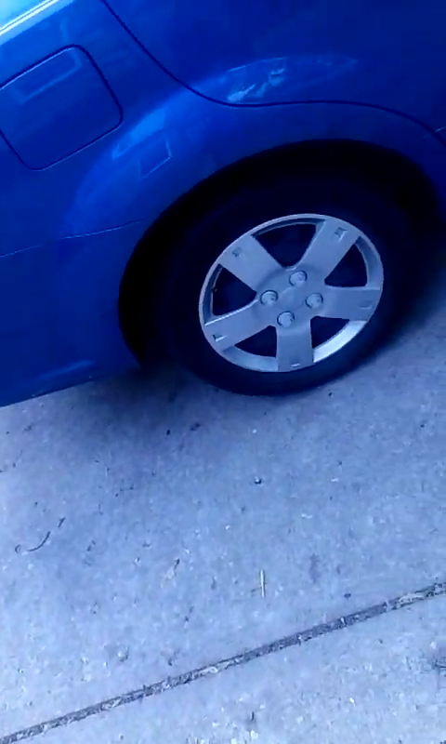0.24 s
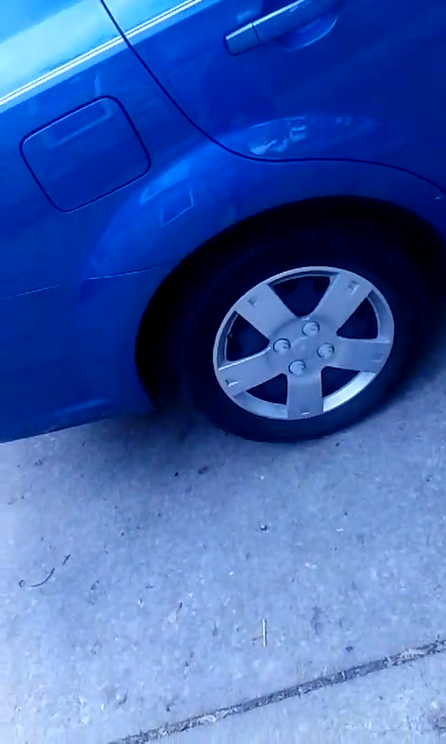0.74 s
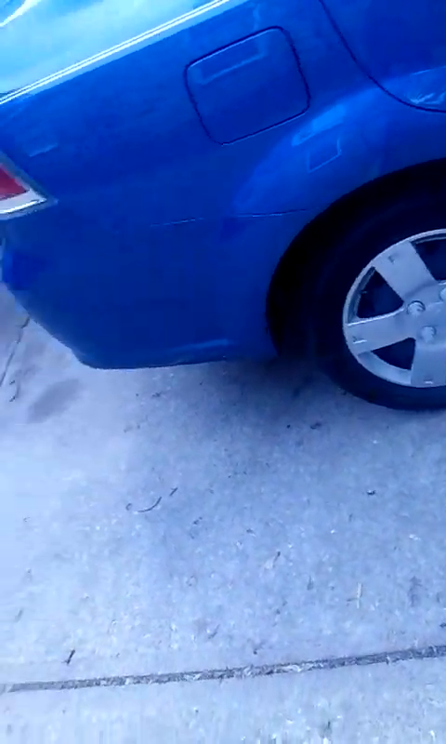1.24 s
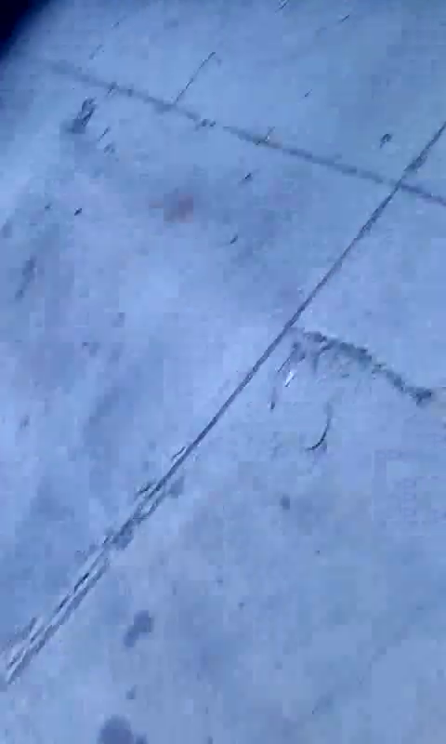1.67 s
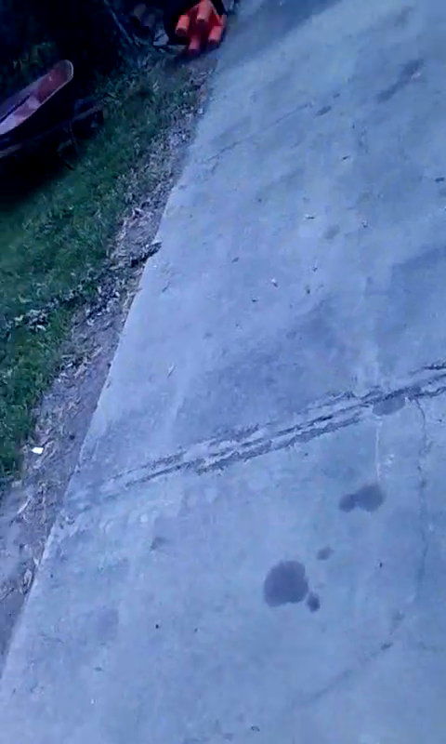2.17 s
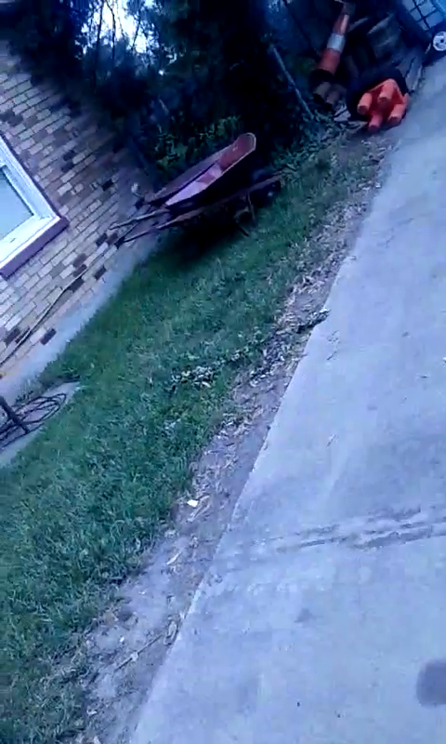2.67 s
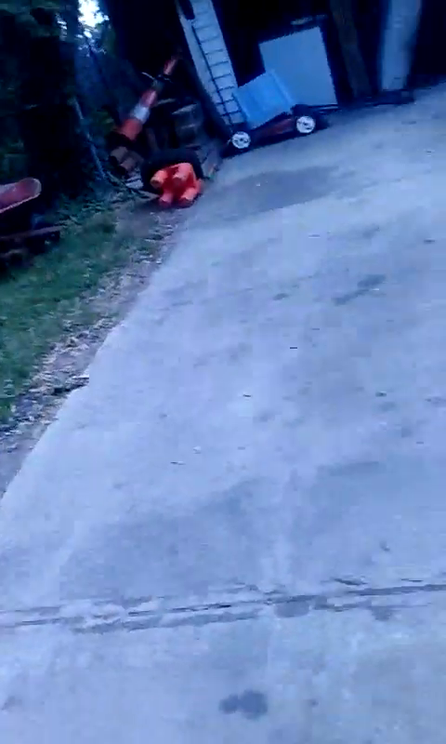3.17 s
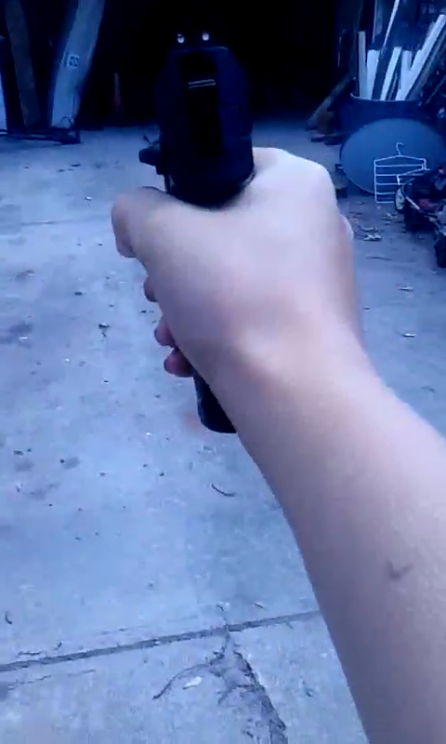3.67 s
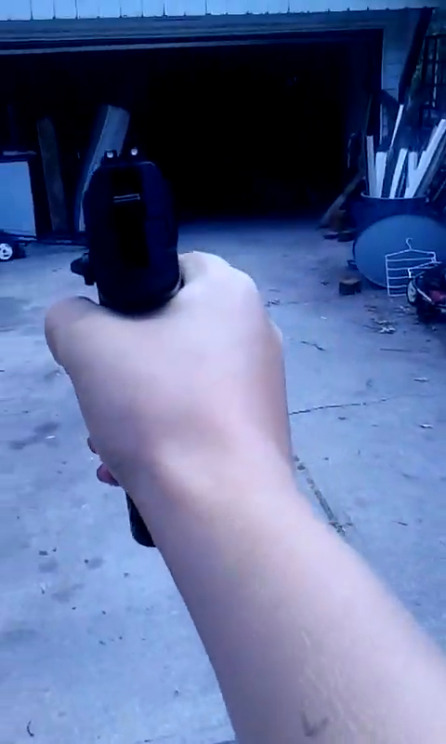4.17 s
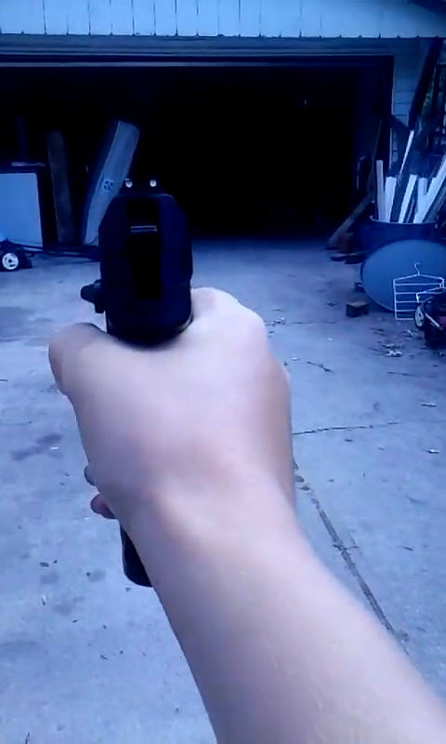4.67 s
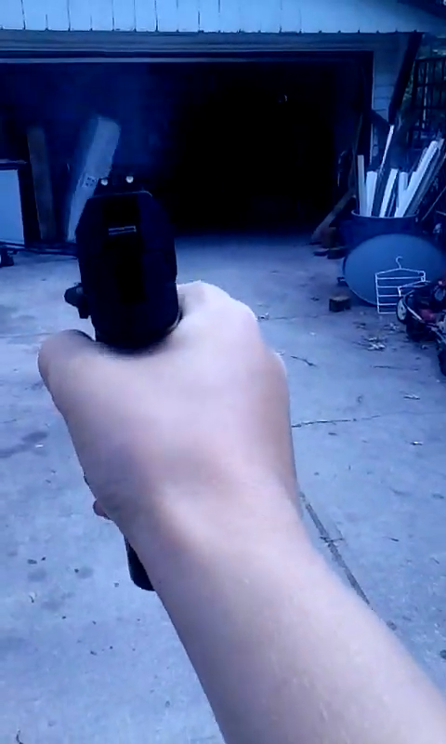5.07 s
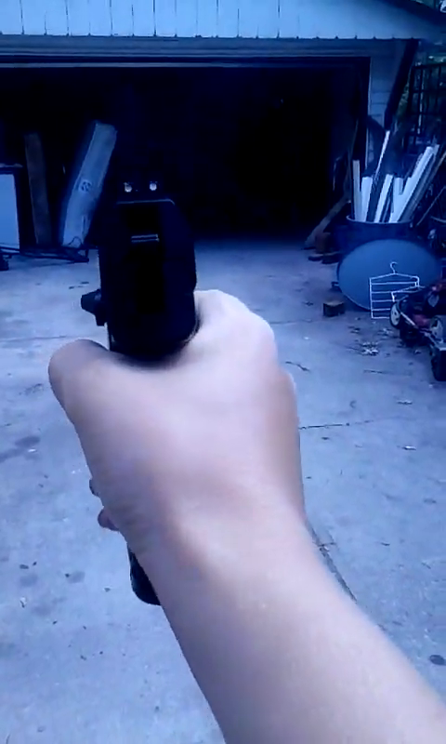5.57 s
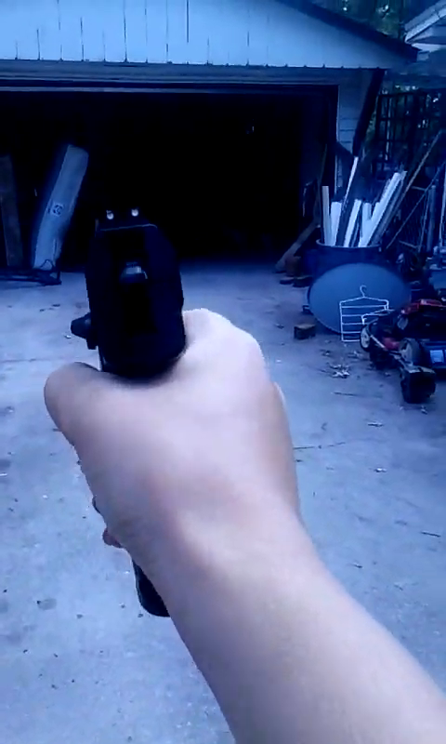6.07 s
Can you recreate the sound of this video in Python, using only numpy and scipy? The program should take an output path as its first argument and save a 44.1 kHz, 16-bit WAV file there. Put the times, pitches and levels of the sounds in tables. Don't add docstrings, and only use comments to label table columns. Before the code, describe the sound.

Outdoors on a concrete drive, wind thumps the microphone while an engine drones and fades and a songbird whistles. A gas blowback pistol fires one hard shot at arm's length, its spring buzzing briefly. After a two-second pause come four accelerating shots, with slide clacks, trigger clicks and short hollow echoes from an open garage. The close phone microphone overloads.

```python
import sys
import numpy as np
from scipy import signal
from scipy.fft import rfft, irfft
from scipy.io import wavfile
from scipy.ndimage import uniform_filter1d

SR = 44100
rng = np.random.default_rng(int(sys.argv[2]) if len(sys.argv) > 2 else 0)


def unload_wav(signal):
    wavfile.write(
        sys.argv[1],
        SR,
        np.round(np.clip(np.atleast_2d(signal).T, -1, 1) * 32767).astype(np.int16),
    )


def natural_amplitude(level_db):
    exponent = np.asarray(level_db, float) / 20
    return 10 ** exponent


N = 279153

# gas blast in seconds, level in dB, delay of the slide's rear stop in ms, stop level in dB.
SHOTS = [
    (2.950, -4.5, 18.0, 11),
    (5.047, -7, 13.2, 9.5),
    (5.503, -6.5, 10.9, 9),
    (5.874, -5, 8.5, 7.5),
    (6.175, -4.5, 8.1, 3),
]
# frequency in Hz, level in dB, T60 in seconds.
TRIGGER_MODES = [(926, -9, .008), (1670, -9, .008), (2250, -4, .007), (2660, 2, .011), (3900, -3, .005),
                 (4700, -13, .004), (5600, -14, .003), (7000, -6, .003), (8200, -5, .003),
                 (10300, -6, .002), (11800, -6, .003), (14000, -8, .002)]
GARAGE_MS = 42


def colour(points):
    hz, db = np.transpose(points)
    f = np.maximum(np.fft.rfftfreq(N, 1 / SR), 1)
    gain = natural_amplitude(np.interp(np.log(f), np.log(hz), db, -90, -90))
    x = irfft(rfft(rng.standard_normal(N)) * gain, N)
    return x / x.std()


def walk(rate):
    hold = int(SR / rate)
    steps = np.repeat(rng.standard_normal(N // hold + 1), hold)
    return 0.92 * uniform_filter1d(uniform_filter1d(steps, hold), hold)[:N]


def fade(t, t60):
    return (t >= 0) * 10 ** (-3 * np.maximum(t, 0) / t60)


def ring(modes, rattle_s, treble_db=0., split_hz=4600., rise_s=0.0019, spread=0.028):
    t = np.arange(8192) / SR
    hz, db, t60 = np.transpose(modes)[:, :, None]
    detune = 1 + spread * rng.standard_normal(hz.shape)
    level = natural_amplitude(db + treble_db * (hz > split_hz))
    body = (level * fade(t, t60) * np.sin(2 * np.pi * hz * detune * t)).sum(0)
    chance = rng.standard_normal(t.size)
    spikes = chance * np.abs(chance) ** 0.48
    contacts = spikes * fade(t, 3 * abs(rattle_s)) * (1 - np.exp(-t / rise_s))
    y = signal.fftconvolve(body, contacts)[:t.size]
    return y / np.abs(y).max()


def add(out, s, x):
    i = int(s * SR)
    out[i:i + len(x)] += x[:N - i]


def pistol():
    # frequency in Hz, level in dB per Hz.
    jet_spectrum = [(180, -1), (300, -8.5), (1780, -14), (2610, -17), (4440, -24), (7950, -21),
                    (13500, -28), (16000, -52)]
    # frequency in Hz, level in dB, T60 in seconds.
    slide_modes = [(320, -17, 0.096), (437, -12, 0.019), (710, -33, 0.0036), (930, 8, 0.017),
                   (1130, -21, 0.0077), (1625, 5.5, 0.018), (2160, 16, 0.0072), (2540, 9, 0.005),
                   (3300, 13, 0.0069), (5500, -54, .003), (8000, -10, 0.0026), (11200, -10, 0.0025),
                   (13700, -27, .002)]
    # frequency in Hz, level in dB, T60 in seconds.
    garage_modes = [(270, -8, .1), (410, 0, .17), (620, -8, .1), (800, -6, .1)]
    hammer_lead_ms, hammer_db = 5.8, -2
    swell_lead_ms, swell_db = 3.5, -16
    puff_hz, puff_t60_s, puff_db = 114, 0.018, 1
    recoil_hz, recoil_db = 34.7, 1
    slap_db, hollow_db, drive_db = -5, -21, 8

    gas, parts, hollow = np.zeros((3, N))
    t, jet = np.arange(4096) / SR, colour(jet_spectrum)
    recoil = natural_amplitude(recoil_db) * fade(t, 0.022) * np.sin(2 * np.pi * recoil_hz * t)
    crack = natural_amplitude(-8.5) * (fade(t, 0.054) + natural_amplitude(16) * fade(t, 0.017))
    for s, db, stop_ms, stop_db in SHOTS:
        swing = fade(t, puff_t60_s + 1.19 * stop_ms / 1e3) * np.sin(2 * np.pi * puff_hz * t + 2.3)
        jet_burst = crack * jet[int(s * SR):][:t.size]
        add(gas, s, natural_amplitude(db) * (natural_amplitude(puff_db) * swing - recoil + jet_burst))

        hammer_s, strike_db = s - hammer_lead_ms / 1e3, db + hammer_db
        swell = ring(TRIGGER_MODES, 0.021, rise_s=0.0079)
        add(parts, hammer_s - swell_lead_ms / 1e3, natural_amplitude(strike_db + swell_db) * swell)
        add(parts, hammer_s, natural_amplitude(strike_db) * ring(TRIGGER_MODES, 0.0028, rise_s=0.002))
        add(parts, s, natural_amplitude(db - 5.0) * ring(slide_modes, 0.0015))
        add(parts, s + stop_ms / 1e3, natural_amplitude(db + stop_db) * ring(slide_modes, 0.0022, -33.0))

        slap_ms = 28.5 if s == SHOTS[0][0] else 21.4
        add(hollow, s + slap_ms / 1e3, natural_amplitude(db + slap_db) * ring(slide_modes, 0.0006, rise_s=0.0002))
        boom = ring(garage_modes, 0.0015, rise_s=0.0044, spread=0.022)
        add(hollow, s + GARAGE_MS / 1e3, natural_amplitude(db + hollow_db) * boom)
    return natural_amplitude(drive_db) * np.array([gas, parts, hollow])


def muzzle():
    out = np.zeros(N)
    for s, db, *_ in SHOTS:
        add(out, s, natural_amplitude(db) * np.array([1., .5]))
    return out


def yard(x):
    # centre frequency in Hz, T60 in seconds, level in dB.
    yard_bands = [(164, 0.87, -6.5), (371, 0.22, 8.5), (1050, 0.25, 5), (2410, 0.32, -1.5),
                  (6060, 0.3, -10.5), (11800, 0.17, -7.5)]
    yard_db, first_wall_ms, garage_db = 17.5, 6.6, 0.5
    late_db, late_slower = -20, 3.24
    t, echo = np.arange(SR // 2) / SR, 0
    build_up = 1 - np.exp(-(t * 1e3 / first_wall_ms) ** 2)
    for hz, t60, db in yard_bands:
        edges = [hz / 1.534, min(hz * 1.535, 18000)]
        band = signal.butter(2, edges, "bandpass", fs=SR, output="sos")
        walls = (fade(t, t60) + natural_amplitude(late_db) * fade(t, late_slower * t60)) * build_up
        garage = natural_amplitude(garage_db) * fade(t - GARAGE_MS / 1e3, 0.15 * t60) * fade(GARAGE_MS / 1e3, t60)
        echo = echo + natural_amplitude(db) * (walls + garage) * signal.sosfilt(band, rng.standard_normal(t.size))
    return natural_amplitude(yard_db) * signal.fftconvolve(x, echo / np.sqrt(np.sum(echo ** 2)))[:N]


def trigger_clicks():
    # time in seconds, peak in dB, treble in dB.
    handling = [(0.0677, -39, -34), (0.2064, -29, -16), (0.221, -42, -23), (0.6583, -47, -19),
                (2.171, -36, -32), (4.0714, -42, -11), (4.0926, -39, -15), (5.233, -40, 0),
                (5.266, -42, -7), (5.665, -30, -17), (5.7007, -31, -15), (5.7184, -28.5, 10)]
    # first click in seconds, its dB, second click in ms later, its dB.
    releases = [
        (3.162, -31, 37.4, -23),
        (5.2783, -29.5, 34.4, -19.5),
        (5.693, -22, 16.5, -21.5),
        (6.0286, -19, 11.5, -20),
        (6.3125, -21, 12.5, -19),
    ]
    # take-up in seconds, level in dB, travel to the sear in ms.
    pulls = [
        (5.4161, -21.5, 40),
        (5.783, -20.5, 40.5),
        (6.094, -20, 35.4),
    ]
    # share of the travel, dB relative to the take-up, treble in dB, rattle in ms.
    pull_steps = [
        (0., -3.5, -17, 13),
        (0.591, -13, -9, 3.8),
        (1., -11.5, -32, 6),
        (1.21, -11.5, 11, 10),
    ]
    release_treble_db, release_ms, handling_ms = -15, 9, 3.4
    rows = [(s, db, treble_db, handling_ms) for s, db, treble_db in handling]
    for s, db, gap_ms, second_db in releases:
        rows.append((s, db, release_treble_db, release_ms))
        rows.append((s + gap_ms / 1e3, second_db, release_treble_db, release_ms))
    for s, db, travel_ms in pulls:
        for share, under_db, treble_db, rattle_ms in pull_steps:
            rows.append((s + share * travel_ms / 1e3, db + under_db, treble_db, rattle_ms))
    return rows


def ticks():
    # frequency in Hz, level in dB, T60 in seconds.
    spring_modes = [(6900, 0, 0.0029), (8200, 5, 0.0099), (9760, 4, 0.015), (11900, -17, .002),
                    (14500, -11, .002)]
    # start in seconds, peak in dB, length in ms.
    shivers = [
        (3.059, -30, 60),
        (3.095, -35, 40),
    ]
    # frequency in Hz, level in dB, T60 in seconds.
    cloth_modes = [(2600, -37, 0.0032), (3580, 20, 0.012), (4430, 11, 0.019)]
    # start in seconds, peak in dB, length in ms.
    rustles = [
        (.25, -46, 63),
        (.29, -49, 80),
        (1.15, -48, 74),
        (2.175, -46, 42),
        (4.23, -49, 69),
        (4.29, -49, 50),
    ]
    spread = 0.035
    out = np.zeros(N)
    for s, db, treble_db, rattle_ms in trigger_clicks():
        click = ring(TRIGGER_MODES, rattle_ms / 1e3, treble_db + 20.5, rise_s=0.00096, spread=spread)
        add(out, s - .0015, natural_amplitude(db + 6) * click)
    for s, db, length_ms in shivers:
        add(out, s, natural_amplitude(db) * ring(spring_modes, length_ms / 1e3, spread=spread))
    for s, db, length_ms in rustles:
        add(out, s, natural_amplitude(db) * ring(cloth_modes, length_ms / 1e3, rise_s=0.014))
    return out


def notes():
    # start and length in seconds, edge and top in Hz, level in dB.
    arches = [
        (.985, .19, 2500, 2770, -47.5),
        (1.735, .21, 2010, 2290, -48.5),
        (2.31, .055, 2020, 2140, -55),
    ]
    # start and length in seconds, first and last pitch in Hz, level in dB.
    slurs = [(1.155, .095, 2580, 1980, -48), (1.245, .06, 2020, 2290, -47), (1.295, .075, 2240, 2260, -56),
             (1.595, .065, 3080, 3220, -47), (1.65, .032, 3200, 3420, -40), (2.17, .07, 2860, 2880, -64),
             (2.245, .035, 2780, 2880, -48), (2.3, .06, 2950, 2900, -57), (2.352, .036, 2850, 3060, -44),
             (2.49, .03, 2100, 2040, -51), (2.83, .065, 2650, 2100, -57), (2.885, .06, 2990, 3170, -44),
             (4.81, .23, 5380, 5170, -70)]
    # start and length in seconds, first and held Hz, level in dB.
    drops = [
        (1.675, 0.046, 3180, 2670, -36.5),
        (2.281, 0.01, 3070, 3000, -43.5),
        (2.379, 0.091, 2760, 2440, -39.5),
        (2.455, 0.029, 2420, 1950, -43),
    ]
    drop_s = 0.008

    def share(length):
        return np.linspace(0, 1, int(length * SR))

    rows = [(s, a + (b - a) * np.sin(np.pi * share(n)) ** 1.4, db) for s, n, a, b, db in arches]
    rows += [(s, a + (b - a) * share(n), db) for s, n, a, b, db in slurs]
    rows += [(s, b + (a - b) * np.exp(-share(n) * n / drop_s), db) for s, n, a, b, db in drops]
    return rows


def bird():
    out, tremble = np.zeros(N), 1 + 0.012 * walk(160)
    for s, hz, db in notes():
        whistle = np.sin(2 * np.pi * np.cumsum(hz * tremble[int(s * SR):][:hz.size]) / SR)
        add(out, s, np.sqrt(2) * natural_amplitude(db) * whistle * signal.windows.tukey(hz.size, 0.16))
    out = out * natural_amplitude(1.5 * walk(80))
    t = np.arange(SR // 2) / SR
    near_and_far = fade(t - .004, 0.13) + natural_amplitude(-11) * fade(t - .004, 0.5)
    trees = rng.standard_normal(t.size) * near_and_far
    smear = signal.fftconvolve(out, trees / np.sqrt(np.sum(trees ** 2)))[:N]
    return natural_amplitude(-4) * out + natural_amplitude(-2) * smear


def engines(t):
    # time in seconds, firing rate in Hz, level in dB.
    drone_course = [
        (0.0, 65.2, -49.5),
        (0.4, 65.37, -52.5),
        (0.66, 64.8, -45),
        (1.22, 66.18, -44.5),
        (1.6, 66.66, -49.5),
        (1.75, 65.8, -61),
        (2.2, 62.5, -59.5),
    ]
    # multiple of the firing rate, level in dB.
    drone_orders = [(1, 0), (2, -10), (3, -6), (4, 1), (5, -4), (6, -6), (7, -9), (8, -17.5), (9, -25)]
    # frequency in Hz, level in dB.
    hum_lines = [(49.5, -60), (99, -51), (148, -55), (250, -59), (298, -57), (350, -61.5), (400, -74)]
    s, hz, db = np.transpose(drone_course)
    turn = 2 * np.pi * np.cumsum(np.interp(t, s, hz) * (1 + 0.0041 * walk(4.5))) / SR
    drone, hum = 0, 0
    for k, order_db in drone_orders:
        brighten_db = 2.5 * (k - 5) * np.clip(t - 1.1, -1, 1)
        drone = drone + natural_amplitude(order_db + brighten_db + 1.3 * walk(2.1)) * np.sin(k * turn + k * k)
    for line_hz, line_db in hum_lines:
        hum = hum + natural_amplitude(line_db + 1.4 * walk(3.05)) * np.sin(2 * np.pi * line_hz * t)
    return np.sqrt(2) * (natural_amplitude(np.interp(t, s, db, right=-90)) * drone + hum)


def air(t):
    # frequency in Hz, level in dB per Hz.
    wind_spectrum = [(15, 13), (30, -0.5), (70, 5), (140, -2.5), (220, -8), (400, -18), (1000, -41)]
    traffic_spectrum = [(24, -11), (40, 6), (296, 1), (389, 0.5), (460, -3), (923, -5), (1500, -37),
                        (2100, -52)]
    tyre_spectrum = [(500, -47), (1000, 8), (1600, 0.5), (2600, -3), (3500, -13), (5000, -28.5)]
    # time in seconds, level in dB.
    wind_force = [(0, -26.5), (1.2, -30), (1.45, -29.5), (1.75, -37.5), (2.3, -39), (2.9, -40), (3.5, -51),
                  (4.2, -49), (4.6, -37.5), (5.2, -56), (6.33, -48)]
    road_load = [(0, -40), (1.65, -41.5), (2.15, -44), (2.9, -41), (3.5, -41), (4.05, -37.5), (5.0, -38.5),
                 (6.33, -37)]
    # time in seconds, dB above the breeze.
    buffets = [(.088, 7.5), (.197, 6.5), (.52, 6.5), (.685, 7.5), (.78, 0), (.98, 9), (1.18, 8),
               (1.33, 3.5), (1.62, 7), (2.1, 9.5), (4.45, 13), (5.63, 6)]
    buffet_s = 0.021
    car_s, car_width_s, car_db = 2.8, 0.4, 4.5

    lumps_db = 3 * walk(13) + 1.7 * walk(24.6)
    lumps_db = lumps_db + sum(db * np.exp(-((t - s) / buffet_s) ** 2) for s, db in buffets)
    wind = natural_amplitude(np.interp(t, *np.transpose(wind_force)) - 4.5 + lumps_db) * colour(wind_spectrum)
    load_db = np.interp(t, *np.transpose(road_load))
    traffic = natural_amplitude(load_db - 3.5 + 2.0 * walk(6.29)) * colour(traffic_spectrum)
    tyre_db = -51.5 + (load_db + 40.5) + car_db * np.exp(-((t - car_s) / car_width_s) ** 2)
    tyres = natural_amplitude(tyre_db + 2.1 * walk(9.9)) * colour(tyre_spectrum)
    return wind + traffic + tyres


def scene():
    t = np.arange(N) / SR
    gas, parts, hollow = pistol()
    clicks = ticks()
    into_yard = muzzle() + natural_amplitude(-50) * gas + natural_amplitude(-54) * parts + natural_amplitude(-36) * clicks
    echoes = yard(into_yard) + hollow
    return np.tile(gas + parts + clicks + echoes + bird() + engines(t) + air(t), (2, 1))


def top_cut(x):
    return signal.sosfilt(signal.butter(12, 16500, fs=SR, output="sos"), x)


def record(dry):
    # frequency in Hz, level in dB per Hz.
    hiss_spectrum = [(1470, -6), (2500, -30), (3060, -50), (3460, 3), (5310, -1), (15200, 0.5), (16000, -1)]
    ceiling, hiss_db, uneven_db = 0.61, -58.5, -35
    drive = dry / ceiling
    flat = ceiling * np.tanh(drive ** 3 / 3 + drive) + natural_amplitude(hiss_db) * colour(hiss_spectrum)
    treble = signal.butter(2, 1500, "highpass", fs=SR, output="sos")
    trace = signal.sosfilt(treble, flat[0] * rng.standard_normal(N))
    flat = flat + natural_amplitude(uneven_db) * trace * np.array([[1], [-1]])
    flat = signal.sosfilt(signal.butter(1, 22, "highpass", fs=SR, output="sos"), flat)
    flat = signal.sosfilt(signal.ellip(6, .3, 30, 15900, fs=SR, output="sos"), flat)
    return top_cut(flat)


dry = scene()
out = record(dry)
unload_wav(out)
```